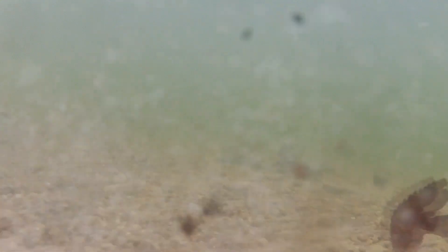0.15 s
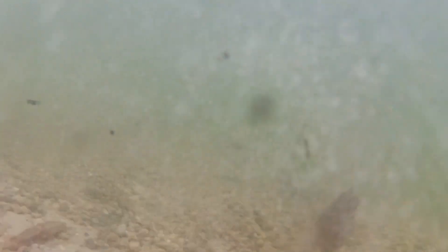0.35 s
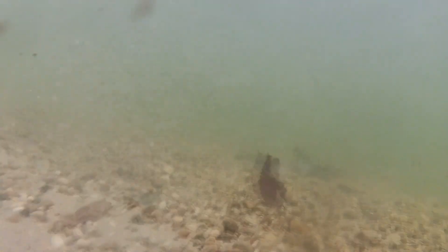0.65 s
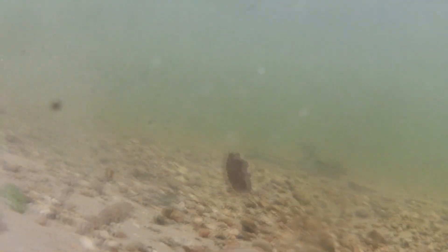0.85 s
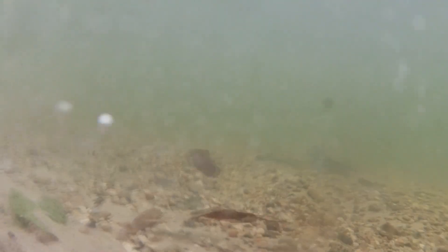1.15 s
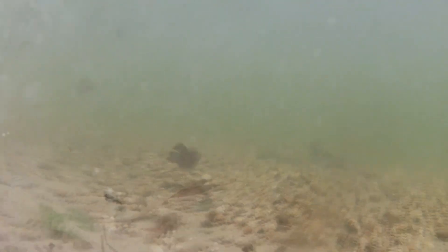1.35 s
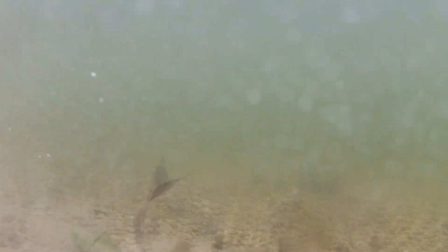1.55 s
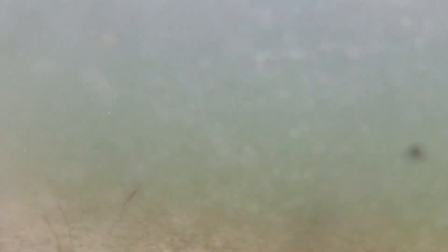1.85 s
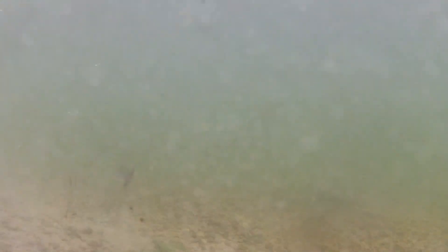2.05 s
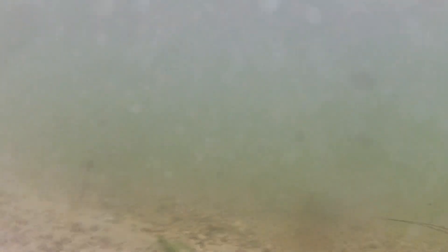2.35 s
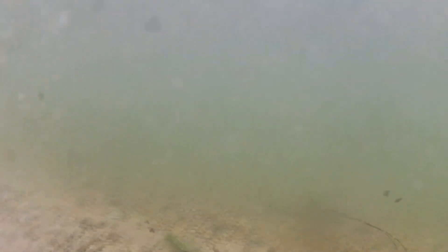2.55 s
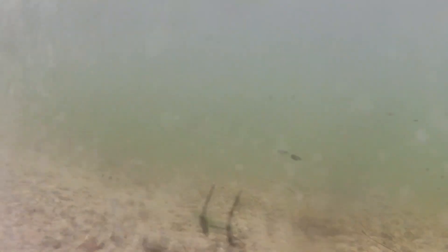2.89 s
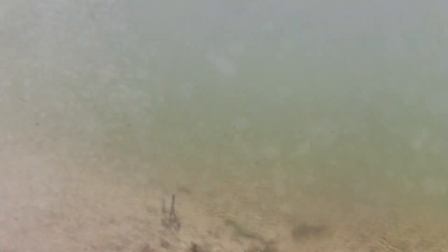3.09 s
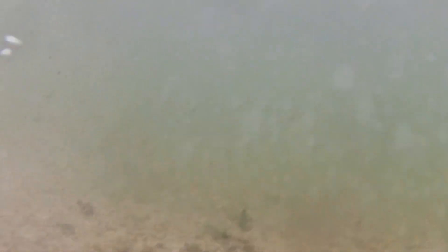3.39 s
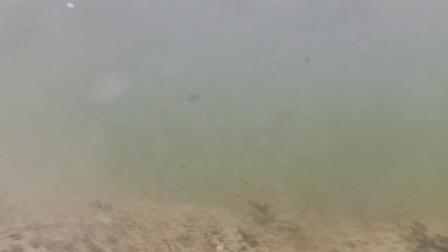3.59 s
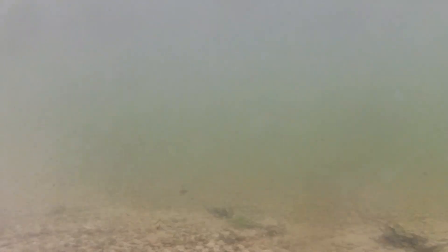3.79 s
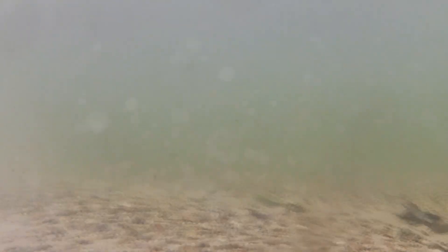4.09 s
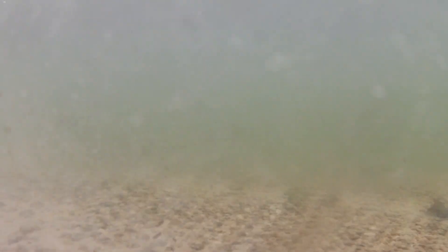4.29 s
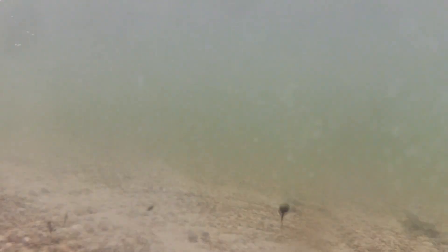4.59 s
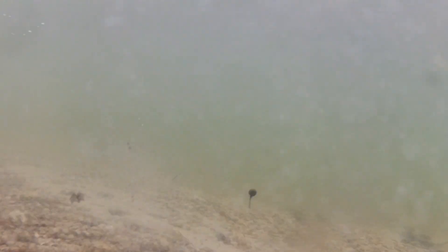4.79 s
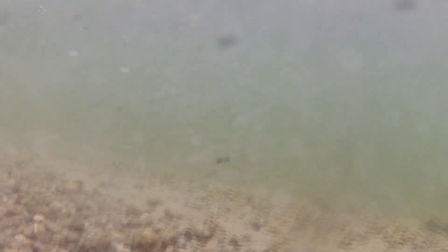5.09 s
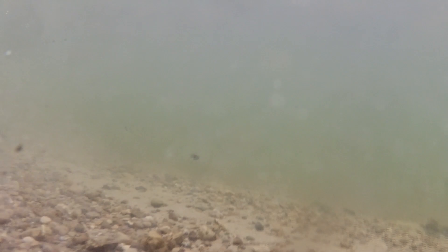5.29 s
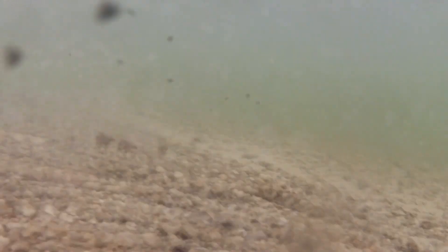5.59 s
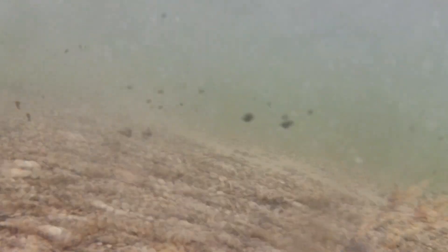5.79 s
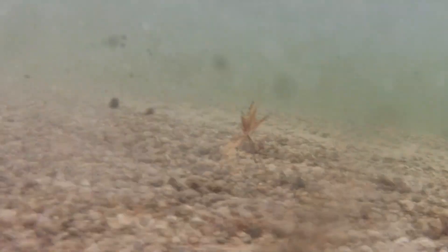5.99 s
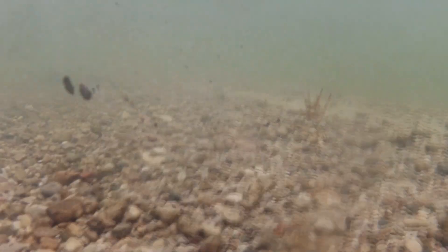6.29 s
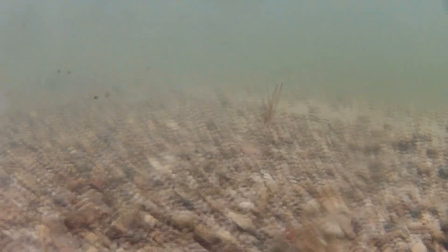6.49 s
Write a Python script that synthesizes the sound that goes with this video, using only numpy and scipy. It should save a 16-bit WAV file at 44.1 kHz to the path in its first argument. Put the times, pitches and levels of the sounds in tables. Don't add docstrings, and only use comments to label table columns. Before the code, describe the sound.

Heard from inside a sealed casing under water, a heavy mass is pulled across river gravel. Low, uneven rumble and hollow knocks dominate, with grit crunching in surges. Big stones thump the shell around the middle, later a pebble strikes sharply. The drag nearly stops shortly before the end, leaving faint hiss, then stirs again. Close, boxy and overloaded at peaks.

```python
import sys
import numpy as np
from scipy import signal
from scipy.fft import rfft, irfft
from scipy.io import wavfile
from scipy.ndimage import uniform_filter1d, minimum_filter1d

SR = 44100
rng = np.random.default_rng(int(sys.argv[2]) if len(sys.argv) > 2 else 0)


def put_to_file(sound):
    columns = np.atleast_2d(sound).T
    safe = np.clip(columns, -1, 1)
    whole_steps = np.round(safe * 32767)
    wavfile.write(sys.argv[1], SR, whole_steps.astype(np.int16))


def decibels_to_gain(level_db):
    exponent = np.asarray(level_db, float) / 20
    return 10 ** exponent


N = 293265


def curve(table, axis):
    columns = np.transpose(table)
    return np.interp(np.arange(N) / SR, columns[0], columns[axis])


def swells(rows, axis):
    out = np.zeros(N)
    for row in rows:
        shape = np.hanning(int(max(row[1], .01) * SR))
        i = int(row[0] * SR) - len(shape) // 2
        out[i:i + len(shape)] += row[axis] * shape[:N - i]
    return out


def walk(rate):
    k = int(SR / rate)
    held = np.repeat(rng.standard_normal(N // k + 1), k)
    return 1.025 * uniform_filter1d(uniform_filter1d(held, k), k)[:N]


def contacts(rate, spread_db):
    hit = rng.random(N) < rate / SR
    force = hit * rng.standard_normal(N) * decibels_to_gain(spread_db * rng.exponential(size=N))
    return force / np.sqrt(np.mean(force ** 2))


def blows(times, db):
    out = np.zeros(N)
    out[(times * SR).astype(int)] = decibels_to_gain(db) * np.sign(rng.standard_normal(len(times)))
    return out


def bursts(times, db, lengths, rise=0.0089):
    out, t = np.zeros(N), np.arange(SR // 5) / SR
    for s, gain, length in zip(times, decibels_to_gain(db), lengths):
        i = int(s * SR)
        shape = (1 - np.exp(-t / rise)) * np.exp(-t / max(length, .002))
        out[i:i + len(t)] += gain * shape[:N - i]
    return out


def ring(force, modes, low_hz, high_hz, order=3, wander_db=0.):
    hz = np.fft.rfftfreq(N, 1 / SR)
    low, high = 1j * hz / low_hz, 1j * hz / high_hz
    band = 1
    for angle in np.pi * (np.arange(order) + .5) / (2 * order):
        damping = 2 * np.sin(angle)
        band = band * low ** 2 / (low ** 2 + damping * low + 1) / (high ** 2 + damping * high + 1)
    body = []
    for k, (f, width, db) in enumerate(modes):
        resonance = 1j * hz * width / (f * f - hz ** 2 + 1j * hz * width)
        body.append((-1) ** k * decibels_to_gain(db) * resonance)
    sound = sum(mode * rfft(force * decibels_to_gain(wander_db * walk(26))) for mode in body)
    return irfft(sound * band, N) / np.sqrt(np.mean(np.abs(sum(body) * band) ** 2))


def ping(s, db, hz, t60):
    out, i = np.zeros(N), int(s * SR)
    t = np.arange(min(int(1.5 * t60 * SR), N - i)) / SR
    envelope = np.exp(-np.log(1000) * t / t60) * (1 - np.exp(-t / 0.00072))
    out[i:i + len(t)] = decibels_to_gain(db) * np.sin(2 * np.pi * hz * t) * envelope
    return out


# [t/s, load level/dB, grind level/dB]
DRAG = [(0, -16.5, -38), (0.22, -11.5, -35.5), (0.42, -23, -46), (0.62, -22.5, -47.5), (0.82, -17, -50.5),
        (1.7, -12.5, -34), (2.34, -16.5, -43.5), (2.58, -18, -46.5), (2.98, -14, -35.5),
        (3.3, -17.5, -41.5), (4.14, -17, -41.5), (4.46, -13, -33.5), (5.22, -17, -45), (6.17, -15, -36),
        (6.22, -35, -66.5), (6.5, -34, -74), (6.58, -17.5, -53.5), (6.65, -14.5, -44.5)]
# [middle t/s, length t/s, load level/dB, grind level/dB]
HOPS = [(0.404, 0.14, -5.5, -1.5), (0.614, 0.1, -4, -2), (0.813, 0.13, -8, -1.5), (0.893, 0.23, 0.7, -3),
        (1.432, 0.22, -4.5, 2.5), (1.666, 0.044, -7, -2.5), (1.726, 0.32, 0.5, -4), (1.931, 0.05, -6, -3.5),
        (2.18, 0.085, -4.5, -4), (2.335, 0.048, -5, -4), (2.395, 0.045, 0, -1.5), (2.619, 0.1, -5, -3),
        (2.893, 0.058, -2.5, -3), (2.978, 0.052, -3, -1), (3.208, 0.07, -9, -16), (3.307, 0.14, -1.5, -7),
        (3.422, 0.049, -9, -3), (3.497, 0.057, -6, -5), (3.751, 0.11, -1.5, 3), (4.011, 0.17, -6, -5.5),
        (4.17, 0.071, -3.5, -7), (4.5, 0.14, -2.5, -2.5), (4.789, 0.082, -6, -2.5),
        (4.929, 0.086, -5, -3.5), (5.223, 0.07, -4.5, -11), (5.647, 0.13, -8.5, -2),
        (5.912, 0.24, -2.5, -5), (6.121, 0.14, -5, -11.5), (6.351, 0.1, -10.5, -11)]
# [middle t/s, length t/s, load level/dB, grind level/dB]
DIGS = [(0.314, 0.15, 2, 4.5), (0.524, 0.16, 1.5, 4), (0.983, 0.059, -1, -1), (1.048, 0.19, 1.8, 7),
        (1.257, 0.18, 4, -2.8), (1.337, 0.086, 8, 5), (1.561, 0.26, 3.5, 3), (1.9, 0.029, 8.5, 2.5),
        (1.979, 0.11, 2.5, 0.5), (2.13, 0.067, 7.5, 1.5), (2.256, 0.13, 2, 5), (2.285, 0.034, 1, -1.5),
        (2.439, 0.09, 2.8, 5), (3.078, 0.4, 3.5, 1.9), (3.24, 0.039, 3, 10.5), (3.392, 0.028, 7.5, 8),
        (3.46, 0.043, 6.5, 1), (3.537, 0.049, 5.5, 3.5), (3.607, 0.067, 6.5, 5), (3.697, 0.17, 1.5, 3.7),
        (3.816, 0.077, 4, 6), (3.921, 0.046, 2.5, -1), (4.575, 0.12, 2.5, 2.5), (4.839, 0.12, -1, 6),
        (5.423, 0.029, 3.5, 2), (5.494, 0.19, 4.5, 8), (5.591, 0.12, 1.5, 7.5), (5.792, 0.11, 7, 3),
        (6.032, 0.12, 4.5, 5.5), (6.271, 0.15, 5, 1)]
# [middle t/s, length t/s, load level/dB,
# grind level/dB]
GRIPS = [(6.9, 0.04, -5, 1), (5.6, 0.039, -3, -22), (6.6, .09, -4, 4), (1.0, 0.072, -0.5, 0),
         (0.99, 0.044, -3, 2), (3.222, .02, -1, 7.5), (0.99, .06, 2.5, 4), (.36, 0.067, -1.5, 3),
         (3.8, 0.026, 3.5, 1), (6.495, 0.071, 3.5, 7), (4.3, .04, 2, 0)]
# [middle t/s, length t/s, load level/dB, grind level/dB]
REBOUNDS = [
    (5.606, .03, -8, -2),
    (3.259, .035, -9, -2),
    (5.586, .018, 6, 0),
    (2.19, .03, 0, 4),
    (2.335, .05, 0, 4),
    (2.612, .04, 0, 5),
    (4.17, .04, 0, 4),
    (4.79, .04, 0, 4),
]


def drag_levels():
    moves = HOPS + DIGS + GRIPS + REBOUNDS
    return curve(DRAG, axis=1) + swells(moves, axis=2), curve(DRAG, axis=2) + swells(moves, axis=3)


# [t/s, peak level/dB, length t/s]
STONES = [(0.174, -6, 0.015), (0.262, -3.5, 0.013), (0.74, -24, 0.011), (1.322, 0, 0.01), (1.36, 3, 0.007),
          (1.484, -5.5, 0.012), (1.572, -10, 0.015), (1.611, -0.5, 0.016), (1.886, -5, 0.014),
          (1.948, 2, 0.011), (2.259, 4, 0.017), (2.424, -8, 0.015), (2.646, -4.5, 0.013), (2.703, 2, 0.012),
          (3.169, -1, 0.013), (3.224, -20, 0.004), (3.36, -6, 0.012), (3.385, -13, 0.012),
          (3.436, 3, 0.018), (4.381, 2, 0.011), (4.535, -17, 0.013), (4.587, -8, 0.0091),
          (4.711, -1, 0.013), (4.998, -11, 0.0084), (5.476, -5, 0.012), (5.566, 0, 0.011),
          (5.769, -3.5, 0.012), (6.054, 2, 0.011), (6.109, -0.5, 0.012), (6.609, -2, 0.012)]
# [f/Hz, width f/Hz, level/dB]
SHELL = [(249.8, 120, -10.5), (299.6, 45.4, -4), (368.6, 37, 0), (481, 98, -13.5)]


def shell(load_db, pressure, gravel):
    s, stone_db, length = np.transpose(STONES)
    push = decibels_to_gain(load_db + 0.73 * pressure + 0.57 * walk(40)) + bursts(s, stone_db - 14, length)
    force = push * gravel + blows(s + .004, stone_db + 11)
    return ring(force, SHELL, 130, 650, order=2, wander_db=0.84)


# [t/s, peak level/dB, length t/s]
RAPS = [(0.023, -14, 0.0067), (0.956, -10, 0.0089), (1.147, -7, 0.018), (1.232, -11, 0.009),
        (1.26, -15, 0.008), (1.298, -7.5, 0.008), (1.395, -20, 0.008), (1.553, -12, 0.011),
        (1.87, -23, 0.0071), (1.956, -20, 0.008), (2.015, -28, 0.0069), (2.112, -15, 0.0074),
        (2.205, -20, 0.0071), (2.707, -15, 0.0081), (2.931, -14, 0.0074), (3.012, -8, 0.0063),
        (3.094, -17, 0.008), (3.227, -1, 0.0085), (3.38, -24, 0.0071), (3.445, -11, 0.0053),
        (4.265, -6, 0.04), (4.407, -18, 0.008), (4.461, -14, 0.008), (4.661, -3, 0.011), (4.688, -6, 0.021),
        (4.831, -14, 0.008), (5.287, -26, 0.0073), (5.409, -15.5, 0.0085), (5.463, -20, 0.0069),
        (5.497, -15, 0.008),
        (5.704, -10, 0.011), (5.8, -6, 0.0073), (5.995, -10, 0.0069), (6.033, -13, 0.0061),
             (6.059, -11, 0.0034), (6.106, -7, 0.0084)]
# [f/Hz, width f/Hz, level/dB]
WALLS = [(561, 52, 0.5), (643, 45.3, 0.5), (752, 50, -6.5), (851, 44, -8.5), (1038, 100, -16)]


def walls(load_db, grit_db, pressure, gravel):
    s, rap_db, length = np.transpose(RAPS)
    rattle_db = -6 + 0.48 * load_db + 0.37 * grit_db
    shake = decibels_to_gain(rattle_db + 0.2 * pressure + 0.44 * walk(50)) + bursts(s, rap_db - 16, length, rise=0.0015)
    force = shake * gravel + blows(s, rap_db + 9.5)
    return ring(force, WALLS, 480, 1250, order=2, wander_db=2.17)


# [t/s, peak level/dB, length t/s]
CRUNCH = [(0.745, -34, 0.0067), (0.974, -38, 0.008), (1.303, -22, 0.0082), (1.851, -25, 0.007),
          (1.891, -16, 0.008), (1.951, -21, 0.008), (2.116, -27, 0.0074), (2.232, -17, 0.008),
          (2.382, -32, 0.008), (2.808, -26, 0.0057), (2.847, -34, 0.008), (2.898, -25, 0.008),
          (3.005, -12.5, 0.008), (3.0604, -30, 0.008), (3.168, -18.5, 0.0071), (3.23, -15, 0.006),
          (3.452, -24, 0.008), (3.804, -22, 0.0064), (3.907, -23, 0.0078), (4.432, -17, 0.008),
          (4.52, -23, 0.008), (4.538, -19, 0.008), (4.596, -25, 0.006), (4.622, -27, 0.0073),
          (4.64, -32, 0.008), (4.731, -21, 0.0087), (4.803, -29, 0.008), (4.825, -25, 0.007),
          (4.959, -20.5, 0.008), (5.418, -27, 0.008),
          (5.9685, -45, 0.0065), (5.995, -18, 0.0058), (6.107, -22, 0.0029), (6.1446, -32, 0.0064),
               (6.221, -37, 0.021), (6.2823, -37, 0.0078), (6.565, -41, 0.013), (6.5961, -45, 0.01)]


def grit_force(grit_db, pressure):
    s, crunch_db, length = np.transpose(CRUNCH)
    grind = decibels_to_gain(grit_db - 1.5 + 0.18 * pressure + 2.5 * walk(80))
    grind = grind + bursts(s, crunch_db - 18, length, rise=0.00063)
    sand_floor = decibels_to_gain(-72)
    return (grind + sand_floor) * contacts(12000, 2.0) + blows(s, crunch_db + 4)


# [f/Hz, width f/Hz, level/dB]
LID = [(1340, 220, -3), (1650, 69, 2.5), (1870, 187, -1.5), (2742, 170, -4.5), (3010, 152, -1.5),
       (3685, 360, -1.5), (4410, 94, -11.5)]


def lid(grit):
    return ring(grit, LID, 1000, 5200, order=3, wander_db=2.5)


# [from t/s, to t/s]
DROPOUTS = [(.633, .647), (.911, .925), (1.424, 1.434), (1.678, 1.69), (2.09, 2.104), (5.48, 5.494),
            (6.093, 6.146), (6.48, 6.494)]


def dropout_gain():
    t = np.arange(N) / SR
    dropped = sum((t > a) & (t < b) for a, b in DROPOUTS)
    return uniform_filter1d(np.where(dropped, .1, 1.), size=200)


# [f/Hz, width f/Hz, level/dB]
PORT = [(4300, 370, -10.5), (5470, 330, -1.5)]
PORT_DB = -14


def port(grit, grit_db):
    force = grit * decibels_to_gain(PORT_DB - 0.035 * (grit_db + 40)) * dropout_gain()
    return ring(force, PORT, 5000, 5760, order=4, wander_db=2.5)


# [f/Hz, width f/Hz, level/dB]
LENS = [(7800, 650, 0.0039), (9470, 640, 0.0015)]


def lens(grit, grit_db):
    force = grit * decibels_to_gain(-34 + 0.5 * (grit_db + 41) + 1.2 * walk(12)) * dropout_gain()
    return ring(force, LENS, 4800, 10200, order=2, wander_db=-1.0)


# [t/s, level/dB]
PEBBLE = (5.5918, -0.65)
# [f/Hz, level/dB, t60 t/s]
PEBBLE_MODES = [(926, 0, .024), (1290, -14, .02), (1658, 1, .023), (1950, -9, .014), (2840, -17, .016),
                (3150, -14, .014), (4700, -24, .01), (5170, -25, .012), (6700, -35, .008)]


def pebble():
    return sum(ping(PEBBLE[0], PEBBLE[1] + db, hz, t60) for hz, db, t60 in PEBBLE_MODES)


def chips(grit_db):
    crack = blows(np.array([PEBBLE[0]]), -7)
    force = decibels_to_gain(grit_db - 11.5) * contacts(94, 1.0) + crack
    through_port = ring(force * dropout_gain(), PORT, 4000, 5900, order=3)
    return ring(force, LID, 1000, 5200, order=2) + decibels_to_gain(PORT_DB) * through_port


# [t/s, level/dB, f/Hz, t60 t/s]
THUMPS = [
    (3.2322, -2, 400, .018),
    (3.2416, 0, 330, .03),
    (3.2335, -10, 750, .02),
    (3.2415, -10, 850, .02),
    (3.24, -23, 3600, .014),
    (3.257, -25, 3600, .014),
    (3.389, -1, 400, .018),
    (3.397, -3, 300, .016),
    (5.5915, -1, 700, .014),
    (5.592, -14, 1400, .014),
]


def thumps():
    return sum(ping(*thump) for thump in THUMPS)


# [t/s, peak level/dB, f/Hz]
NICKS = [(0.029, -15, 576), (0.952, -18, 580), (1.244, -9.5, 637), (1.269, -12, 550), (1.305, -11, 660),
         (1.397, -15, 560), (1.959, -16, 633), (2.122, -8, 640), (2.209, -15, 650), (2.707, -16.5, 501),
         (3.1, -11, 557), (3.386, -18, 497), (3.444, -15, 724), (4.264, -9, 564), (4.46, -15, 490),
         (4.663, -9, 576), (4.833, -9, 538), (5.289, -24, 506), (5.419, -14, 560), (5.462, -13, 501),
         (5.994, -13, 506), (6.109, -6, 497)]


def nicks():
    return sum(ping(s, db - 1, hz, .039) for s, db, hz in NICKS)


# [t/s, peak level/dB, f/Hz]
FLECKS = [(0.7502, -31, 3630), (0.9727, -30, 2990), (1.3084, -26.5, 1370), (1.4177, -26, 3060),
          (1.6861, -23, 1640), (1.8562, -24, 3530), (1.8936, -14, 3670), (1.948, -30, 1640),
          (2.1196, -25, 3560), (2.2079, -30, 1730), (2.227, -23.5, 1860), (2.2628, -19.5, 3020),
          (2.38, -29, 1880), (2.817, -21.5, 1840), (2.836, -26, 1850), (2.8968, -26, 3600),
          (2.9303, -22, 1660), (2.9971, -21.5, 2780), (3.0107, -22.5, 1620), (3.061, -24, 1870),
          (3.1632, -23.5, 3630), (3.2251, -26, 1840), (3.2326, -21, 3440), (3.2428, -16, 1440),
          (3.4494, -30, 1200), (3.449, -24, 1830), (3.531, -21, 1880), (3.7409, -25, 1410),
          (3.8113, -25, 1840), (3.82, -18, 3020), (3.907, -25.5, 3690), (4.3273, -25, 1630),
          (4.4321, -24, 1610), (4.5121, -25, 3580), (4.5403, -24, 1200), (4.5406, -26.5, 1640),
          (4.587, -21.5, 3640), (4.6044, -23.5, 3170), (4.626, -17, 2950), (4.6518, -19, 3640),
          (4.6714, -21, 1250), (4.7175, -27, 1240), (4.7333, -26, 1680), (4.804, -26, 1740),
          (4.8269, -19, 1680), (4.9786, -23.5, 1190), (5.407, -28.5, 1300), (5.422, -24, 2930),
          (5.4445, -23, 3030),
          (5.7677, -26, 1300), (5.9682, -25, 2950), (5.9962, -24, 1650), (6.0101, -21, 1260),
               (6.053, -22, 1730), (6.0964, -25, 1340), (6.1089, -25, 1370), (6.1718, -25.5, 1860),
               (6.2192, -42, 3070)]
# [t/s, peak level/dB, f/Hz]
SNAPS = [(0.1521, -36, 5200), (0.5457, -38, 4320), (1.3089, -31, 4290), (1.6287, -32, 4330),
         (1.8572, -35, 4400), (1.9594, -31, 4430), (2.1196, -32, 4400), (2.4733, -34, 5600),
         (2.6973, -38, 4290), (2.9951, -37, 5650), (3.1637, -36, 4520), (3.2241, -34, 4350),
         (3.2316, -25, 4500), (3.3897, -29, 4360), (3.6092, -35, 4220), (3.9, -39, 5300),
         (3.9105, -34, 5470), (4.4004, -35, 5520), (4.6259, -33, 5560), (4.7165, -34.5, 4420),
         (4.9776, -42, 4370), (5.5912, -28, 5060), (5.628, -42, 5180), (5.9973, -32, 4400)]
# [t/s, level/dB, f/Hz, t60 t/s]
GRAIN_ON_LENS = [6.2885, -46, 8200, .012]


def flecks():
    grains = FLECKS + SNAPS
    return sum(ping(s, db + 1.5, hz, .014) for s, db, hz in grains) + ping(*GRAIN_ON_LENS)


# [t/s, peak level/dB]
TICKS = [(0.1575, -29), (1.385, -45), (1.609, -41.5), (1.6302, -35), (3.265, -42.5), (3.4148, -43),
         (4.628, -43), (4.665, -47), (4.605, -50), (4.7466, -49), (4.7915, -44), (4.805, -50),
         (4.8186, -48.5), (4.8641, -50), (5.5707, -47), (5.615, -40), (3.3962, -47.5), (6.2878, -48)]


def ticks():
    out = np.zeros(N)
    s, db = np.transpose(TICKS)
    out[(s * SR).astype(int)] += decibels_to_gain(db + 9)
    return out


# [middle t/s, length t/s, level/dB]
LURCHES = [(0.105, 0.11, -8), (0.309, 0.32, -6.5), (0.863, 0.17, -6.5), (0.943, 0.076, 3),
           (1.402, 0.17, -11), (1.736, 0.12, -4), (1.871, 0.081, 4.5), (2.1, 0.063, -10.5),
           (2.185, 0.13, -1), (2.255, 0.11, 7.5), (2.449, 0.36, 6), (2.784, 0.42, 2), (2.888, 0.1, 6),
           (3.158, 0.1, 9), (3.312, 0.15, -3), (3.482, 0.11, -5.5), (3.697, 0.16, 4.5), (3.796, 0.1, -5),
           (3.816, 0.34, 3.5), (3.931, 0.2, -2.5), (4.046, 0.083, -9.5), (4.55, 0.089, 3.5),
           (4.749, 0.15, 4), (5.138, 0.14, 5.5), (5.348, 0.56, 5.5), (5.667, 0.17, -5), (5.812, 0.17, 4.5),
           (6.106, 0.37, 2.5), (6.371, 0.24, -7), (6.61, 0.097, 8.5)]


def heave_db():
    slow = -2.5 + 0.72 * curve(DRAG, axis=1) + .11 * curve(DRAG, axis=2)
    return slow + swells(LURCHES + GRIPS, axis=2)


# [f/Hz, width f/Hz, level/dB]
MASS = [(61.3, 14.5, -2.5), (86.5, 20.5, 0), (129.7, 36, -7), (167.6, 54, -12)]


def mass():
    return ring(decibels_to_gain(heave_db()) * contacts(900, 1.0), MASS, 46, 460, order=1, wander_db=1.5)


def swash():
    return ring(decibels_to_gain(heave_db() - 25.5) * rng.standard_normal(N), [(28, 25, 0)], 12, 60, order=1)


def hiss():
    grind_ceiling_db, lag_s, fall_db_per_s = -61, .15, 1.6
    slow = uniform_filter1d(np.maximum(curve(DRAG, axis=2), grind_ceiling_db), size=int(lag_s * SR))
    level_db = -86.5 - 0.45 * slow - fall_db_per_s * np.arange(N) / SR
    return decibels_to_gain(level_db + 1.2 * walk(11.0)) * contacts(9000, 1.5) * dropout_gain()


def scene():
    load_db, grit_db = drag_levels()
    pressure, gravel = walk(13), contacts(2500, 1.64)
    grit = grit_force(grit_db, pressure)
    body = shell(load_db, pressure, gravel) + walls(load_db, grit_db, pressure, gravel)
    body = body + lid(grit) + port(grit, grit_db) + lens(grit, grit_db) + chips(grit_db) + mass()
    knocks = pebble() + thumps() + nicks() + flecks() + ticks()
    fade = np.clip(np.arange(N)[::-1] / SR / .02, .1, 1)
    return (fade * (body + swash()) + knocks + hiss())[None]


def top_cut(x):
    return signal.sosfilt(signal.butter(12, 15830, fs=SR, output="sos"), x)


def record(dry):
    notched = signal.lfilter(*signal.iirnotch(4920, 10, SR), dry)
    dry = dry + .65 * (notched - dry)
    gain = np.minimum(1, 1.008 / (np.abs(dry) + 1e-9))
    gain = uniform_filter1d(minimum_filter1d(gain, size=441), size=441)
    return top_cut(np.clip(dry * gain, -1, 1))


dry = scene()
out = record(dry)
put_to_file(out)
```